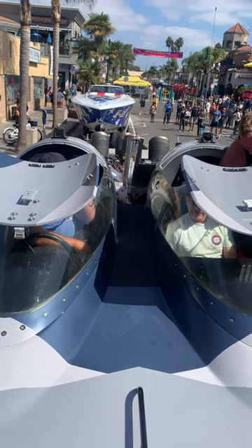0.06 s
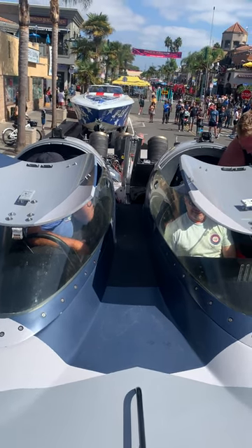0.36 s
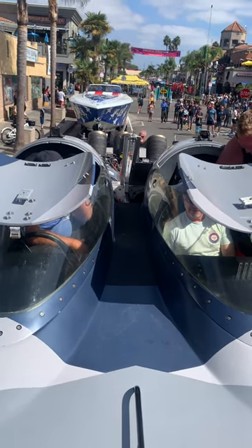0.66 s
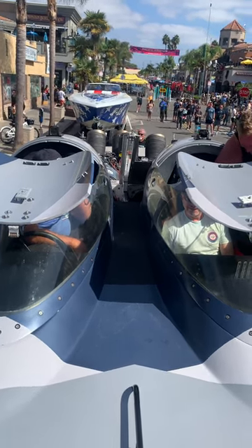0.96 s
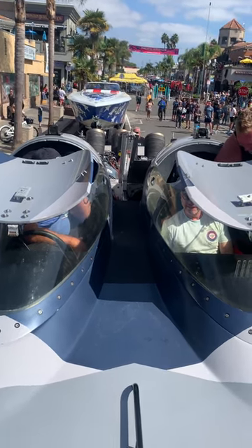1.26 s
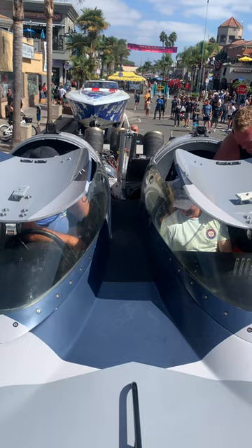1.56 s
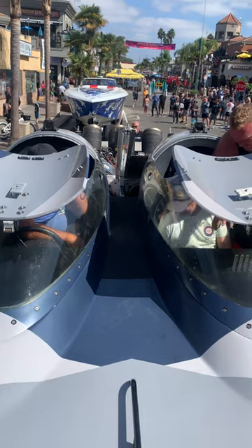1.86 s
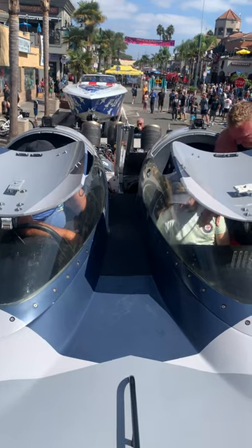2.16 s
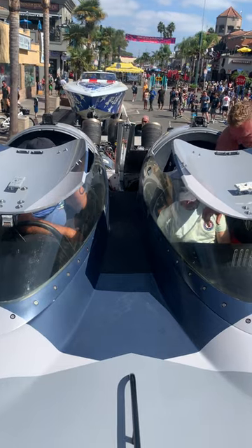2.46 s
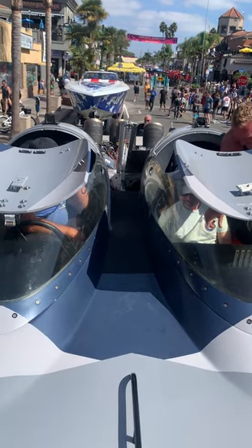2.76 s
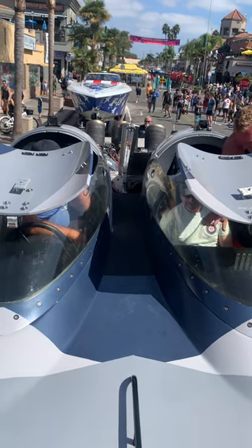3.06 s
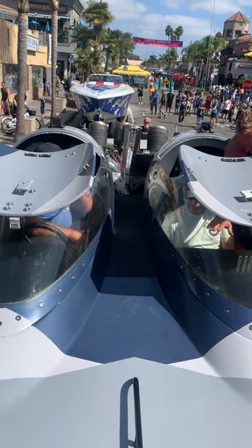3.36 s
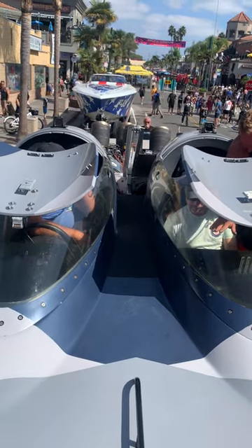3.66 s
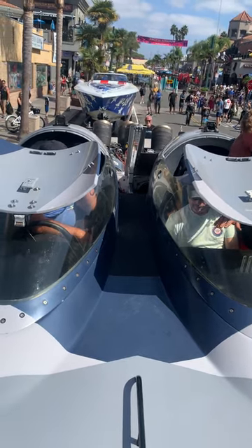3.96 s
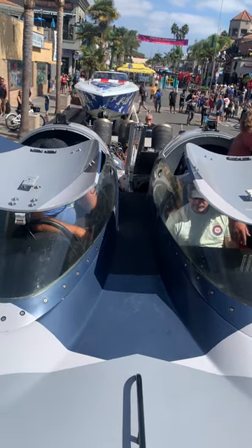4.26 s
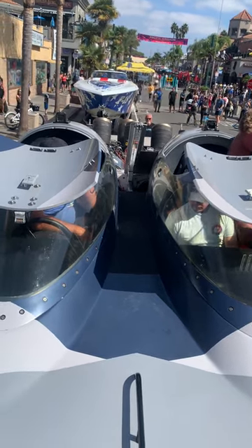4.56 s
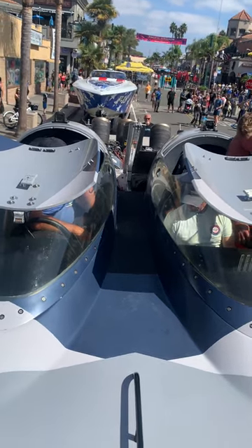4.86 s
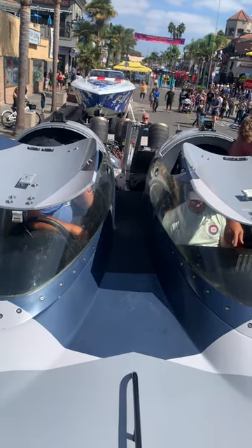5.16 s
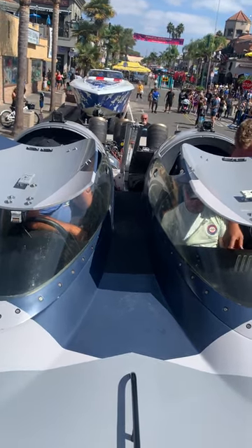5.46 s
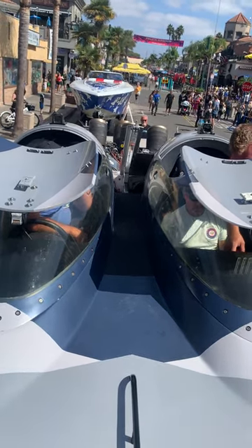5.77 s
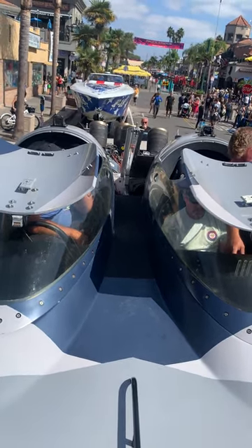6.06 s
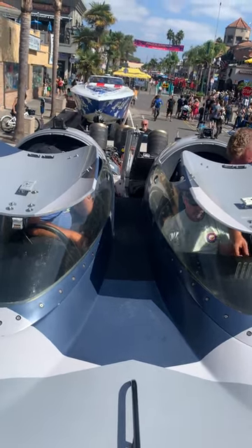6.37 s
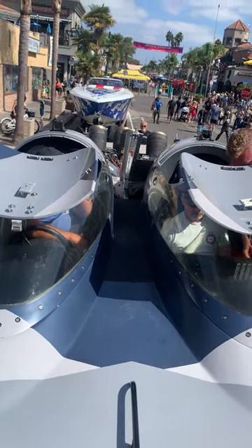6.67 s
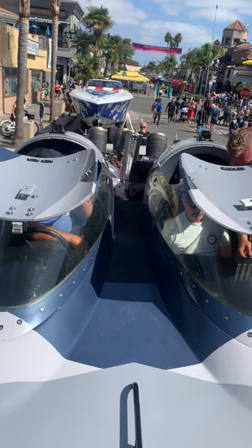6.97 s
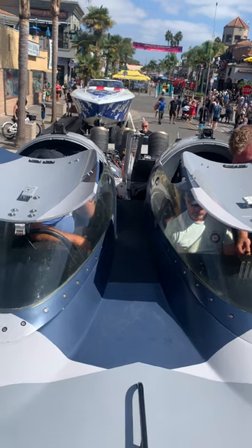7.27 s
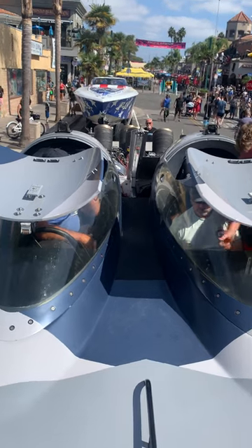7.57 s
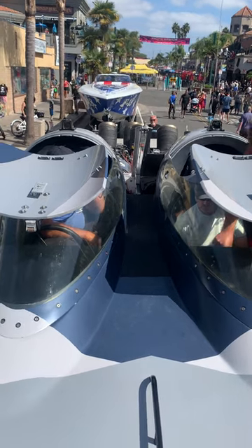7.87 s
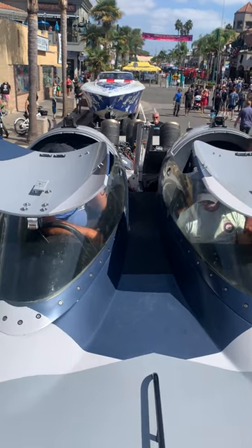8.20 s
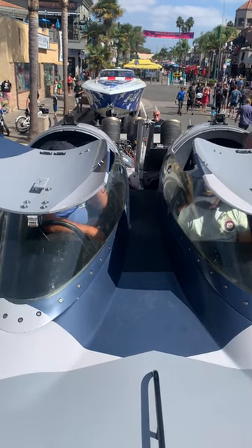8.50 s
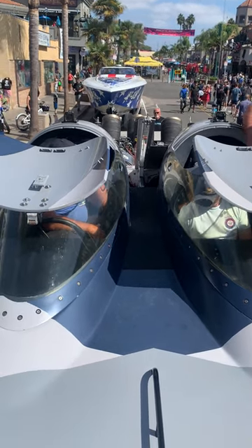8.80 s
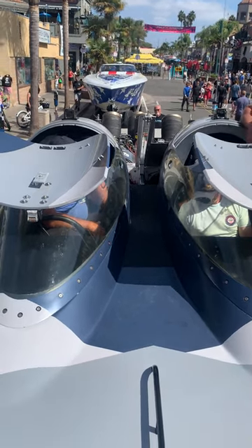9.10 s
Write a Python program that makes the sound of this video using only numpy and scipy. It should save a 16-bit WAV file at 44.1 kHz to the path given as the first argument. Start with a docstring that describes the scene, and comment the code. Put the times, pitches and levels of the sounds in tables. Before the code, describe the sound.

A powerboat's gas turbine runs outdoors, a few metres from the microphone. Its high, shimmering whine and a thinner whistle above it sit over hissing intake air, an even roar and a low, unsteady exhaust hum. After about a second the pitch begins to climb gently and the sound grows slightly louder. A little past halfway it levels off and idles steadily to the end.

```python
"""Powerboat gas turbine, on deck.

A few metres away, the turbine spools up gently and settles at idle. Its whine is a blade tone with
sidebands one shaft rate apart; a faster stage adds a thin whistle nearly an octave above.
The exhaust hums and rumbles, the casing roars in fixed resonances and the intake hisses."""
import sys
import numpy as np
from scipy.fft import rfft, irfft, next_fast_len
from scipy.io import wavfile
from scipy.ndimage import map_coordinates

SR = 44100
rng = np.random.default_rng(int(sys.argv[2]) if len(sys.argv) > 2 else 0)


def to_wav(sig):
    """Store sig (one row per channel, or 1-D mono) as 16-bit WAV at the path in sys.argv[1].

    Samples outside -1..1 are clipped; the rate is SR.
    """
    pcm = np.clip(np.atleast_2d(sig), -1, 1) * 32767
    pcm = np.round(pcm).astype(np.int16)
    wavfile.write(sys.argv[1], SR, pcm.T)  # frames by channels


N = 411894
WHINE_ORDER, WHISTLE_ORDER = 29.714, 53.849  # cycles per shaft turn


def amp(db):
    """Decibels to gain."""
    return 10 ** (np.asarray(db) / 20)


def unit_rms(x):
    """x scaled to rms 1."""
    return x / np.sqrt(np.mean(np.abs(x) ** 2) + 1e-20)


def at_hz(rows, hz):
    """(Hz, value) rows interpolated on a log frequency axis."""
    row_hz, values = np.transpose(rows)
    return np.interp(np.log(hz + 1), np.log(row_hz + 1), values)


def curves(rows):
    """One value per sample for each column after the time."""
    times_s, *columns = np.transpose(rows)
    return [np.interp(np.arange(N) / SR, times_s, column) for column in columns]


def wobble(knots_per_s):
    """A smooth random curve."""
    coarse = np.linspace(0, N, N // 64)
    knots = rng.standard_normal(int(N * knots_per_s / SR) + 4)
    return np.interp(np.arange(N), coarse, map_coordinates(knots, [coarse * knots_per_s / SR]))


def opposed(x):
    """+x at the left microphone port, -x at the right."""
    return x * np.array([[1], [-1]])


# Each row: frequency in Hz, phase lead of the left port in radians.
PORT_LEAD = [(70, 0), (153, -1.25), (290, -3.1), (380, -4.6), (520, -5.5), (780, -4.5), (1280, -.5),
             (1560, -1.3), (2000, .2), (2500, 2.8), (4400, 2.7), (5200, 3.1), (8200, 6.28), (12000, 9.3),
             (13300, 9.6), (15000, 11)]


def lead_at(hz):
    """Radians by which the left port leads at a frequency."""
    return np.interp(hz, *np.transpose(PORT_LEAD))


def tone(hz, lead_rad, scatter, flutter_hz, port_scatter):
    """A stereo line of rms 1, scattered by moving hot air a little differently at each port."""
    drift = lambda: wobble(flutter_hz) + 1j * wobble(flutter_hz)
    path = 1 + scatter * drift() + opposed(port_scatter * drift())
    phase = 2 * np.pi * (np.cumsum(hz) / SR + rng.random()) + opposed(lead_rad / 2)
    return unit_rms(path.real * np.cos(phase) - path.imag * np.sin(phase))


# Each row: frequency in Hz, left-right coherence from 0 to 1.
PORT_COHERENCE = [(100, .99), (600, .98), (850, .9), (1020, .25), (1280, .8), (1800, .85), (2150, .3),
                  (2700, .5), (3900, .35), (4300, .85), (5200, .95), (6500, .8), (8200, .94), (10000, .82),
                  (12500, .97), (14500, .7)]


def turbulence(colour_db):
    """Stereo flow noise of rms 1, coloured by a function of frequency."""
    size = next_fast_len(N + 8192)
    hz = np.fft.rfftfreq(size, 1 / SR)
    mid, side = rfft(rng.standard_normal((2, size)))
    spread_rad = np.arccos(np.clip(at_hz(PORT_COHERENCE, hz), 0, 1)) / 2
    pair = np.cos(spread_rad) * mid + opposed(np.sin(spread_rad) * side)
    spectrum = pair * amp(colour_db(hz)) * np.exp(1j * opposed(lead_at(hz) / 2))
    return unit_rms(irfft(spectrum, size)[:, :N])


# Each row: time in seconds, level in dB of each of the four strong lines, lowest first.
WHINE_DB = [(0.0, -40.7, -38.7, -36.8, -44.8), (0.3, -39.8, -40.7, -44.1, -42.6),
            (0.6, -34.2, -39.6, -41.8, -40.3), (0.9, -34.8, -42.4, -37.3, -42.9),
            (1.2, -36.4, -36.7, -32.0, -41.7), (1.5, -43.7, -28.8, -34.5, -40.9),
            (1.81, -41.1, -29.2, -31.4, -43.3), (2.11, -34.6, -32.7, -30.7, -42.0),
            (2.41, -38.3, -32.8, -28.6, -45.2), (2.71, -40.1, -29.6, -26.1, -40.8),
            (3.01, -42.3, -26.2, -28.5, -44.6), (3.31, -39.5, -28.2, -31.0, -41.2),
            (3.61, -34.3, -27.8, -35.9, -34.6), (3.91, -34.2, -30.7, -32.8, -42.1),
            (4.21, -35.7, -28.7, -35.4, -44.8), (4.51, -36.6, -29.9, -33.5, -44.4),
            (4.82, -38.5, -33.3, -33.4, -35.4), (5.12, -41.1, -36.1, -32.5, -36.3),
            (5.42, -38.2, -35.7, -34.1, -36.1), (5.72, -38.3, -36.6, -30.5, -35.2),
            (6.02, -39.5, -32.8, -32.8, -35.0), (6.32, -36.9, -32.5, -30.2, -36.9),
            (6.62, -40.2, -34.3, -34.3, -37.4), (6.92, -35.0, -40.5, -34.1, -36.3),
            (7.22, -34.6, -36.3, -35.0, -34.0), (7.52, -35.2, -35.1, -34.6, -36.6),
            (7.83, -36.2, -35.6, -37.0, -37.9), (8.13, -35.6, -36.8, -34.8, -36.7),
            (8.43, -38.3, -36.3, -34.4, -37.7), (8.73, -40.2, -34.2, -34.5, -36.6),
            (9.03, -40.4, -35.0, -34.3, -37.6), (9.33, -41.4, -33.8, -32.4, -39.7)]
# Each row: time in seconds, left port's lead in radians for each of those lines.
WHINE_LEAD_RAD = [(0, 2, 2.5, 3.1, 3.4), (.7, 1.7, 2.5, 3.1, 3.4), (1.5, 1.9, 2.9, 4.2, 3.2),
                  (2.1, 1.9, 2.9, 3, 2.8), (2.8, 2, 2.6, 3.7, 3.1), (3.4, 2.9, 2.7, 3.3, 3.3),
                  (3.9, 2.9, 1.9, 2.7, 3), (4.25, 2.8, 4.8, 2.3, 3), (4.7, 2.8, 4.1, 3.3, 3.1),
                  (5.15, 2.7, 3.9, 4.5, 3.1), (5.5, 2.8, 3, 3.2, 3.1), (6.6, 2.6, 3.2, 3.2, 2.9),
                  (6.95, 2.2, 4.8, 3.2, 3), (7.3, 2.6, 3.6, 3.3, 3.1), (8, 2.8, 3.5, 4.6, 3.2),
                  (8.7, 3.1, 3.4, 5, 3.1), (9.34, 3, 3.4, 4.4, 3.1)]
# Levels in dB of the weak lines two orders below and three above the blade tone.
SKIRT_DB = [-50, -46.5]
# Each row: time in seconds, left level over right in dB.
WHINE_BALANCE_DB = [(0, 0), (1, 0), (1.4, -3), (2, -1), (2.7, -3.5), (3.1, -8), (3.7, -2), (4, -2),
                    (4.3, -9), (4.6, -6), (5, -3), (5.6, 0), (6.3, -2), (7, 0), (9.34, -1.5)]


def whine(shaft_hz):
    """The blade tone, modulated once a turn into a comb of lines that swell and fade in turn."""
    lines = np.zeros((2, N))
    for sideband, db, lead_rad in zip((-1, 0, 1, 2), curves(WHINE_DB), curves(WHINE_LEAD_RAD)):
        hz = (WHINE_ORDER + sideband) * shaft_hz
        lines += amp(db) * tone(hz, lead_rad, scatter=.17, flutter_hz=22, port_scatter=.11)
    for sideband, db in zip((-2, 3), SKIRT_DB):
        hz = (WHINE_ORDER + sideband) * shaft_hz
        lines += amp(db) * tone(hz, lead_at(hz), scatter=.63, flutter_hz=20, port_scatter=.078)
    # the gliding lines pass through standing waves over the deck, which favour one port
    balance_db, = curves(WHINE_BALANCE_DB)
    port_gains = amp(opposed(balance_db / 2))
    return lines * port_gains / np.sqrt(np.mean(port_gains ** 2, axis=0))


# Relative levels in dB of the lines from three orders below the whistle to two above.
WHISTLE_DB = [-53, -48, -43, -38, -43.5, -54]
# Each row: multiple of the whine, multiple of the whistle, offset in shaft orders.
MIXING_TONES = [(2, 0, -2), (2, 0, -1), (2, 0, 1), (2, 0, 2), (-1, 1, -2), (-1, 1, -1), (-1, 2, -31)]
# Relative level in dB of each mixing tone.
MIXING_DB = [-40.5, -44.5, -44, -48, -62, -53, -42]
# Each row: frequency in Hz, intake duct gain in dB.
DUCT_DB = [(3400, -14), (7300, -3.5), (7800, -4.5), (8300, 1.5), (8600, -1), (8900, -3.5), (9400, 0)]


def whistle(shaft_hz):
    """A faster stage and its mixing tones with the whine glide through the duct's resonance."""
    stage_orders = WHISTLE_ORDER + np.arange(-3, 3)
    mixing_orders = np.dot(MIXING_TONES, [WHINE_ORDER, WHISTLE_ORDER, 1])
    lines = np.zeros((2, N))
    for order, db in [*zip(stage_orders, WHISTLE_DB), *zip(mixing_orders, MIXING_DB)]:
        hz = order * shaft_hz
        line = tone(hz, lead_at(hz), scatter=.42, flutter_hz=30, port_scatter=.027)
        lines += amp(db + at_hz(DUCT_DB, hz)) * line
    return lines


def blade_noise(shaft_hz):
    """Blades chop turbulent air into a hump of noise that glides with the whine."""
    hz = (WHINE_ORDER + .5) * shaft_hz
    return amp(-37) * tone(hz, lead_at(hz), scatter=30, flutter_hz=480, port_scatter=9)


# Each row: time in seconds, relative hum level in dB.
HUM_DB = [(0.0, -47), (0.62, -40.5), (0.75, -51), (0.88, -42), (1.06, -50), (1.12, -38), (1.35, -48),
          (1.58, -40.5), (2.39, -44), (2.47, -36), (2.7, -39), (2.78, -52), (2.86, -35), (2.96, -52),
          (3.04, -35), (3.09, -46), (3.25, -32.5), (3.33, -55), (3.41, -32), (3.64, -41), (3.69, -34),
          (3.87, -39.5), (4.14, -35), (4.21, -46), (4.37, -35), (4.71, -36), (4.84, -32), (5.23, -35),
          (5.31, -45), (5.36, -31), (5.7, -33), (5.75, -42), (5.96, -36.5), (6.03, -49), (6.11, -38),
          (6.4, -39.5), (6.45, -34), (6.84, -33), (6.97, -49), (7.15, -32.5), (7.36, -38.5), (7.46, -32.5),
          (8.25, -35.5), (8.32, -41.5), (8.53, -34), (8.84, -46.5), (8.9, -33.5), (9.05, -43), (9.13, -30),
          (9.34, -38)]
# Each row: frequency in Hz, relative level in dB.
RUMBLE_SPECTRUM_DB = [(20, -55), (32, -35), (42, -17), (55, -14), (70, -7), (83, -6), (97, -20), (118, 0),
                      (137, -9), (168, -11), (182, -3), (210, -12), (300, -40), (600, -90)]


def exhaust(shaft_hz, rumble_db):
    """An unsteady hum at the shaft rate over the rumble of the flame."""
    hum_db, = curves(HUM_DB)
    hum = tone(shaft_hz, lead_at(shaft_hz), scatter=.25, flutter_hz=20, port_scatter=.03)
    rumble = turbulence(lambda hz: at_hz(RUMBLE_SPECTRUM_DB, hz))
    return amp(hum_db + 1.5) * hum + amp(rumble_db + 3.14) * rumble


# Each row of both: frequency in Hz, relative level in dB.
ROAR_SPECTRUM_DB = [(500, -40), (1000, -16), (1250, -8.5), (1600, -5), (2100, -6.3), (2750, -4.5),
                    (3300, -6.5), (4100, -7.5), (4600, -8), (4980, -3.5), (5250, -8), (5700, -15),
                    (8000, -40)]
HULL_SPECTRUM_DB = [(120, -38), (190, -10.5), (225, -3.5), (280, -3.5), (340, 2), (430, -4), (520, -3),
                    (660, -10), (820, -8), (1000, -15), (1500, -26), (4000, -82)]
# Each row: centre in Hz, width in Hz, height over the roar in dB.
CASING_MODES = [(1433, 30, 3), (1788, 90, 8.5), (1911, 39, 7.5), (2341, 52, 11.5)]


def casing(roar_db):
    """Gas flow roars in the casing's resonances and booms in the hull."""
    def casing_db(hz):
        peaks_db = sum(db / (1 + (2 * (hz - centre_hz) / width_hz) ** 2)
                       for centre_hz, width_hz, db in CASING_MODES)
        return at_hz(ROAR_SPECTRUM_DB, hz) + peaks_db

    roar = amp(roar_db + 5.5 + .7 * wobble(8)) * turbulence(casing_db)
    boom = amp(roar_db - 1 + .3 * wobble(6)) * turbulence(lambda hz: at_hz(HULL_SPECTRUM_DB, hz))
    return roar + boom


# Each row: frequency in Hz, relative level in dB.
HISS_SPECTRUM_DB = [(3000, -12), (5300, -8), (6200, -1.5), (7200, -1), (8100, 1.5), (8800, -1.5),
                    (9600, -4.5), (10500, -6.5), (11600, -6), (12700, -33), (13800, -16.5), (15000, -37)]


def intake(hiss_db):
    """Air tears past the inlet with a slightly wavering hiss."""
    return amp(hiss_db + 1 + .59 * wobble(9)) * turbulence(lambda hz: at_hz(HISS_SPECTRUM_DB, hz))


# Each row: time in seconds, shaft rate in Hz.
SHAFT_HZ = [(0, 142.56), (.8, 142.56), (1.2, 143), (1.6, 143.5), (2, 144.24), (2.4, 145.25), (2.8, 146.53),
            (3.2, 148.05), (4, 150.97), (4.4, 152.18), (4.8, 153.13), (5.2, 153.73), (5.6, 153.97),
            (6.4, 154.1), (7.6, 153.87), (8.8, 153.6), (9.34, 153.56)]
# Each row: time in seconds, relative levels in dB of exhaust rumble, casing roar and intake hiss.
FLOW_DB = [(0.0, -48, -35.5, -34.5), (0.21, -43.5, -36.5, -34.5), (0.65, -44.5, -36, -34),
           (1.43, -43.5, -36, -33), (1.56, -45, -35.5, -33.5), (1.82, -41.5, -35.5, -33),
           (2.18, -43.5, -35, -31.5), (2.99, -43.5, -34.5, -31.5), (3.17, -39.5, -34, -32),
           (3.22, -43, -35, -32), (3.51, -40.5, -35, -32), (4.52, -42.5, -34, -30.5),
           (4.73, -41, -34, -31.5), (5.51, -44, -34, -30), (5.57, -41, -34, -30.5),
           (5.88, -43.5, -33.5, -30.5), (6.09, -45, -33.5, -32), (6.22, -41, -34, -31),
           (6.89, -44, -34, -31.5), (6.97, -40.5, -34, -31.5), (8.22, -43, -34.5, -31),
           (8.4, -39.5, -35, -31), (8.48, -43, -34, -31.5), (8.59, -38, -35, -31.5),
           (8.76, -43.5, -34, -30.5), (9.18, -42.5, -33.5, -30.5), (9.34, -41, -33.5, -31)]


def scene():
    """The shaft speed sets the pitch of every tone; the gas flow sets the noise levels."""
    shaft_hz, = curves(SHAFT_HZ)
    rumble_db, roar_db, hiss_db = curves(FLOW_DB)
    draw_gain = amp(hiss_db - np.max(hiss_db) - 1.5)  # grows with the air drawn in
    blades = whine(shaft_hz) + draw_gain * (whistle(shaft_hz) + blade_noise(shaft_hz))
    return blades + exhaust(shaft_hz, rumble_db) + casing(roar_db) + intake(hiss_db)


def record(dry):
    """The microphone passes nothing above 15.2 kHz."""
    size = next_fast_len(N + SR // 2)
    passband = np.fft.rfftfreq(size, 1 / SR) < 15200
    return irfft(rfft(dry, size) * passband, size)[..., :N]


dry = scene()
out = record(dry)
to_wav(out)
```